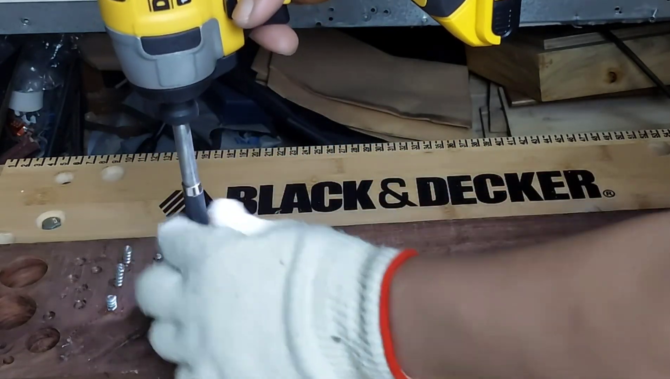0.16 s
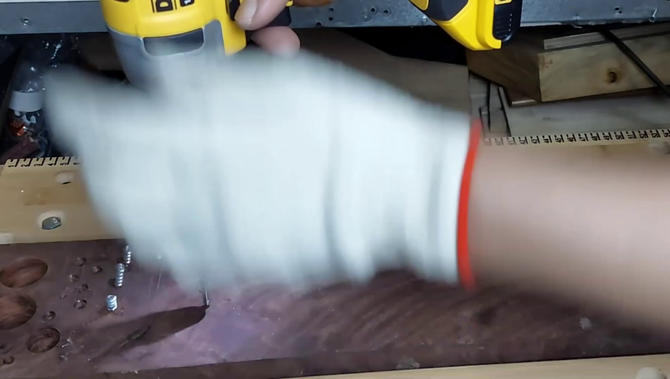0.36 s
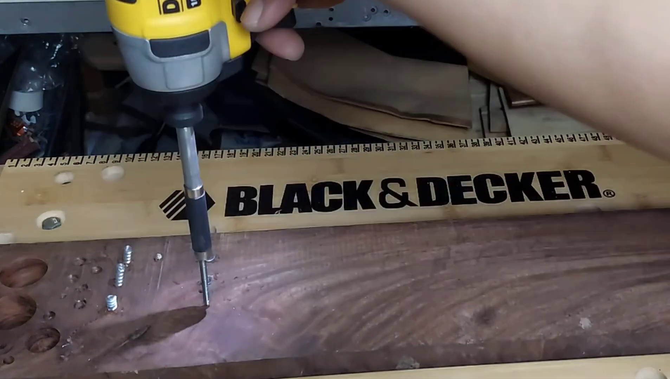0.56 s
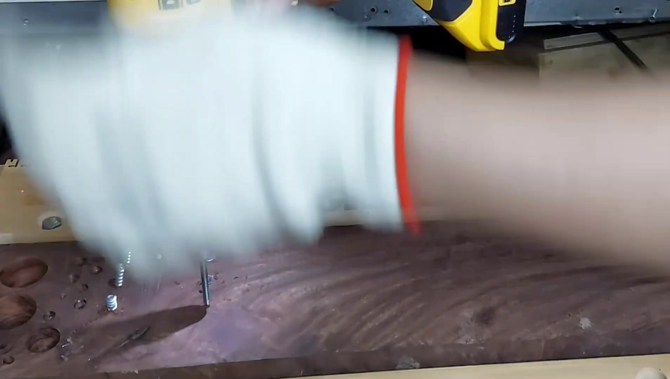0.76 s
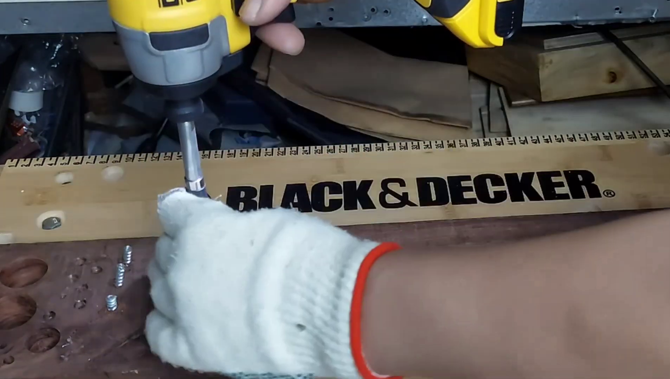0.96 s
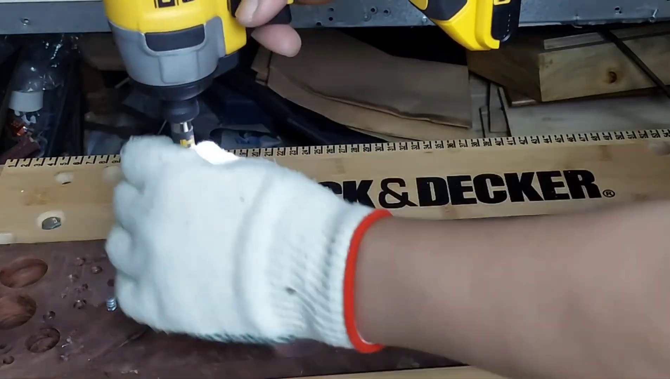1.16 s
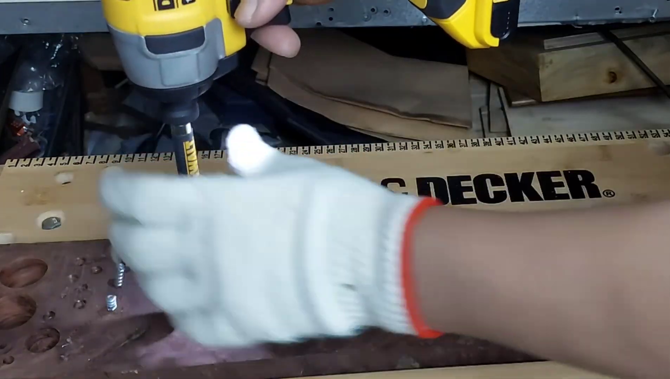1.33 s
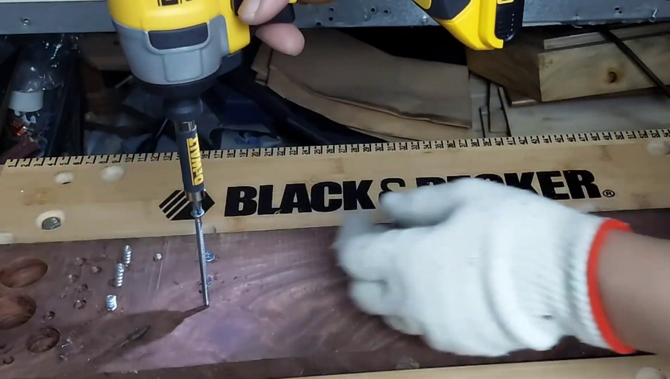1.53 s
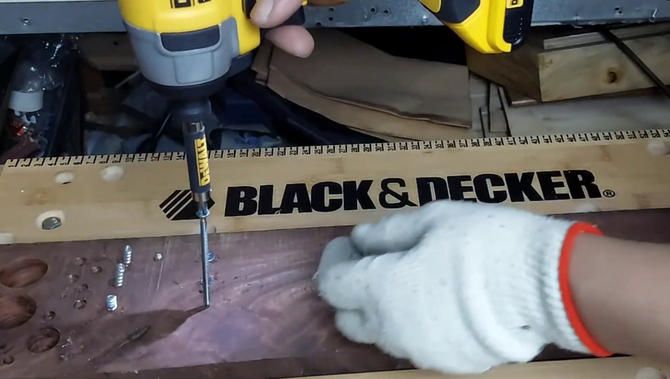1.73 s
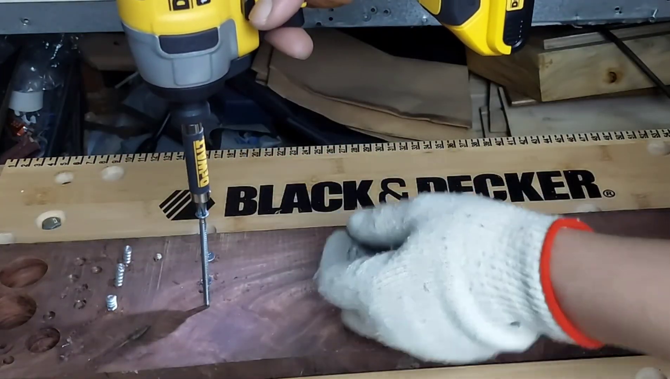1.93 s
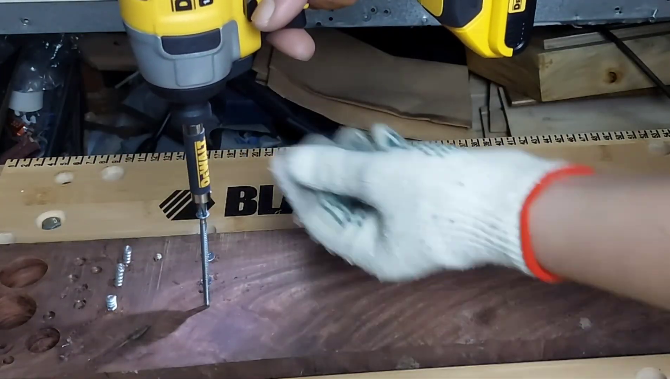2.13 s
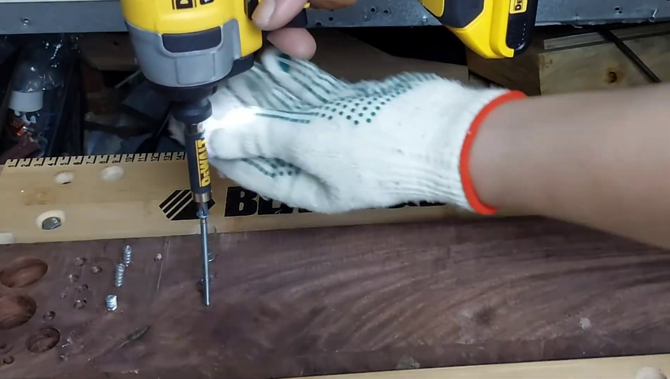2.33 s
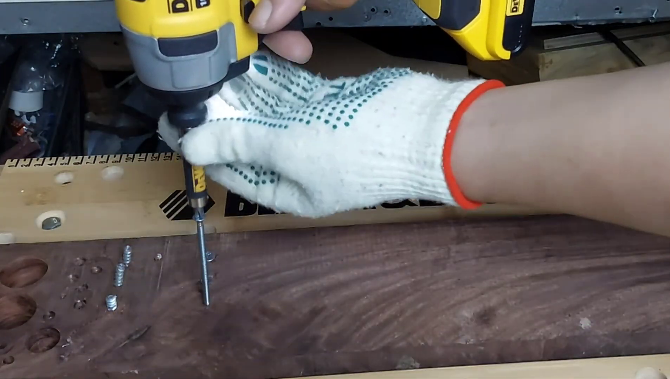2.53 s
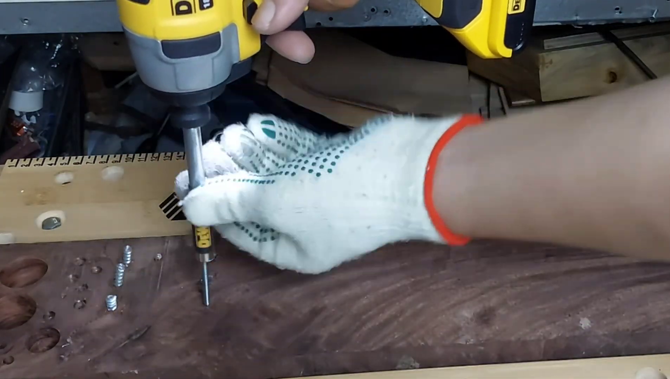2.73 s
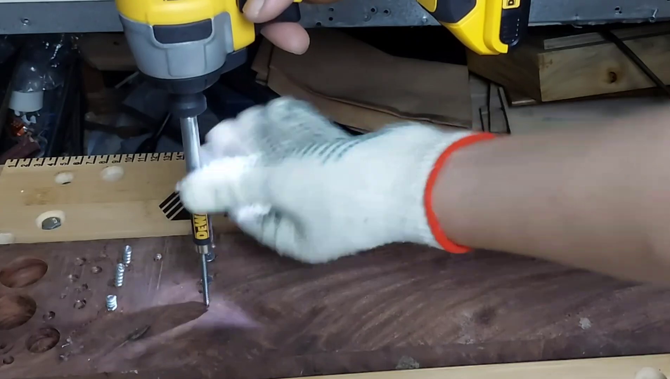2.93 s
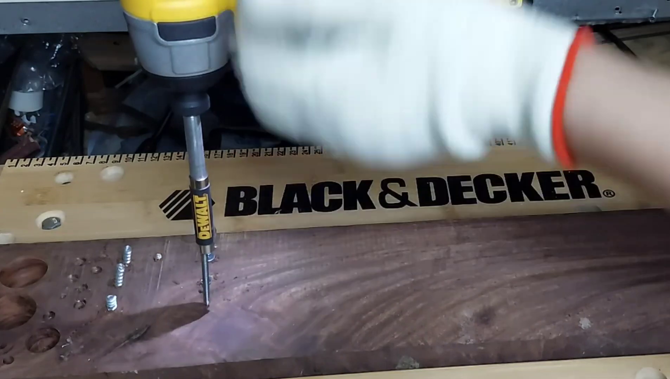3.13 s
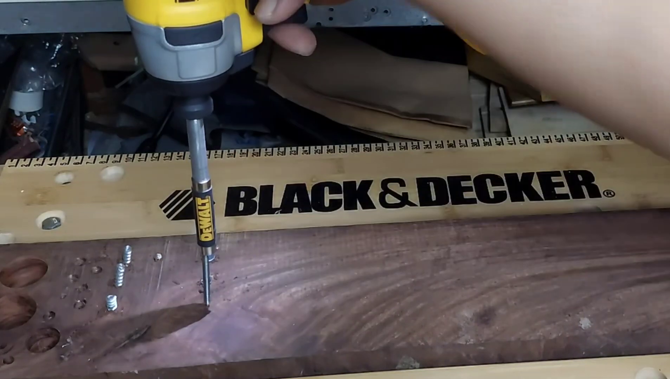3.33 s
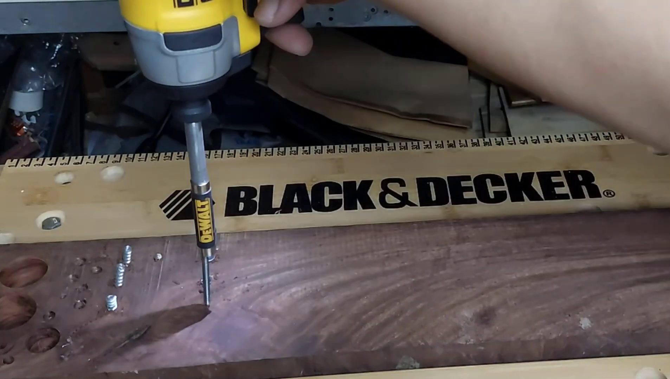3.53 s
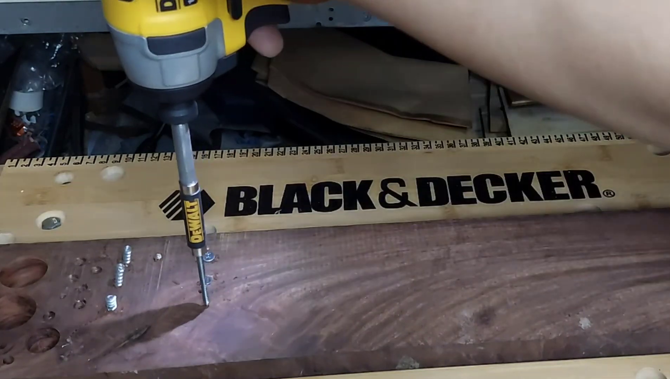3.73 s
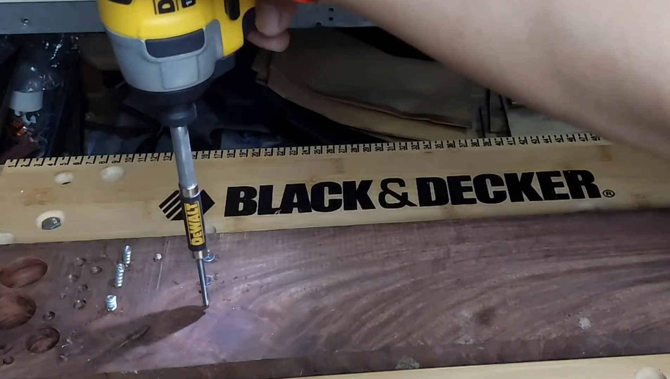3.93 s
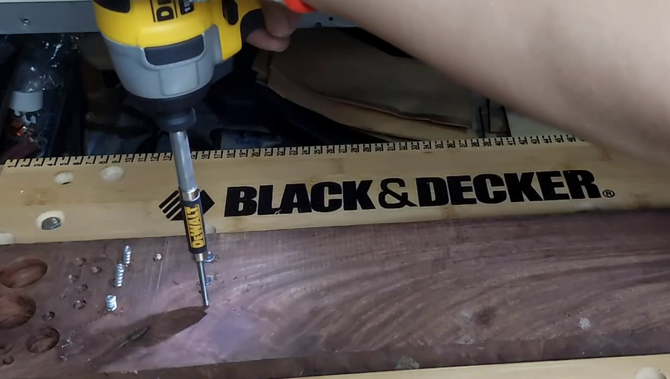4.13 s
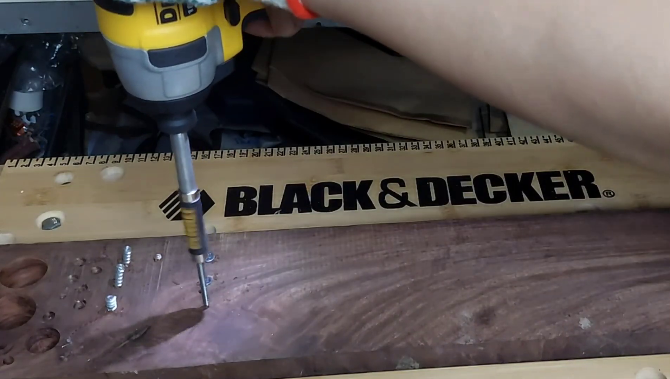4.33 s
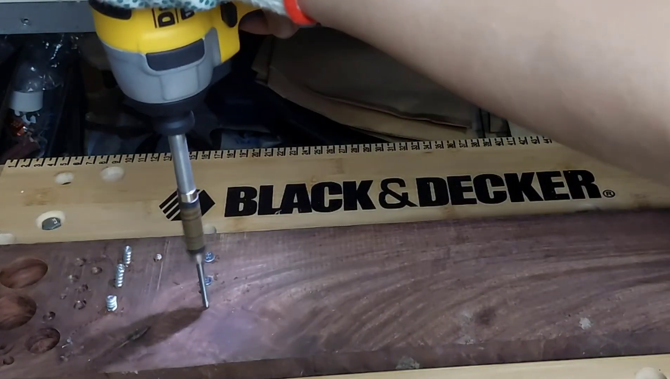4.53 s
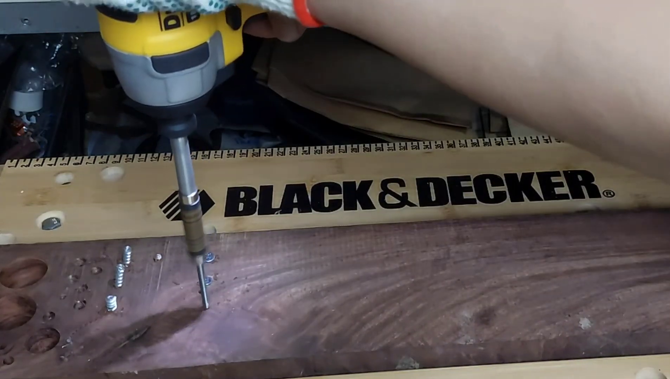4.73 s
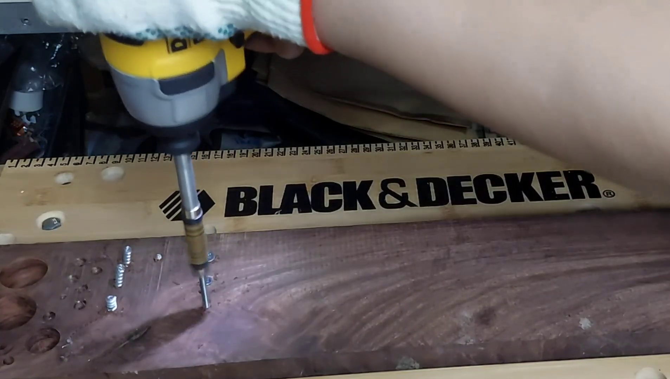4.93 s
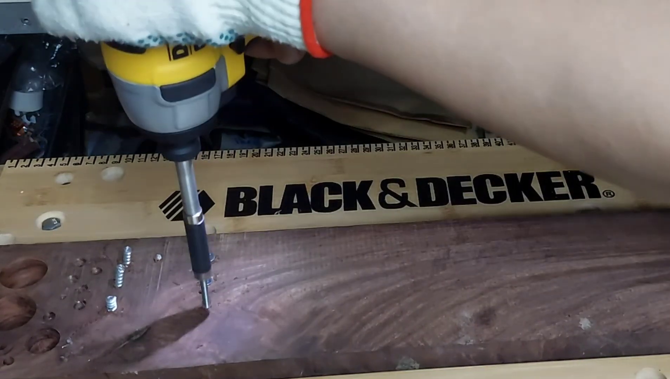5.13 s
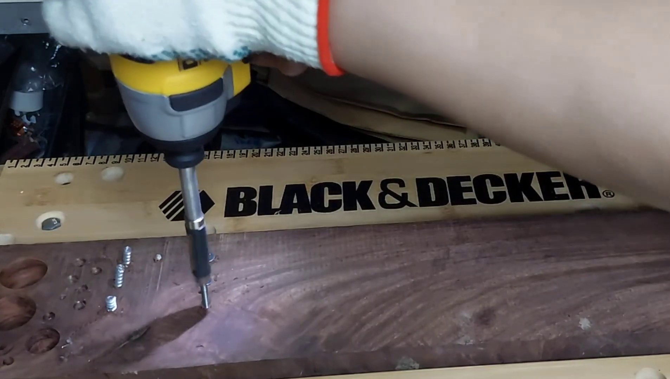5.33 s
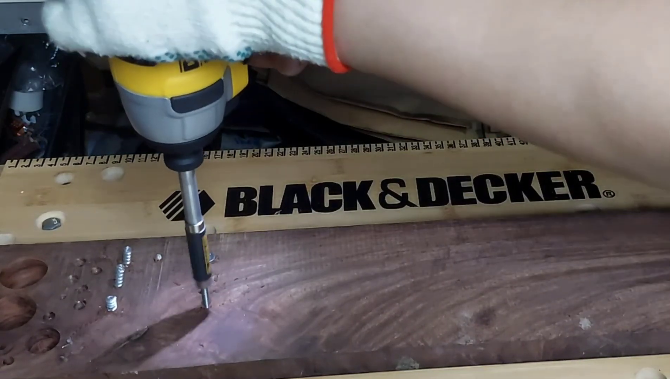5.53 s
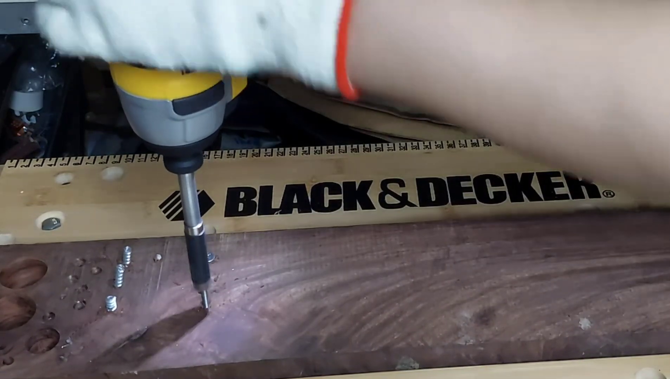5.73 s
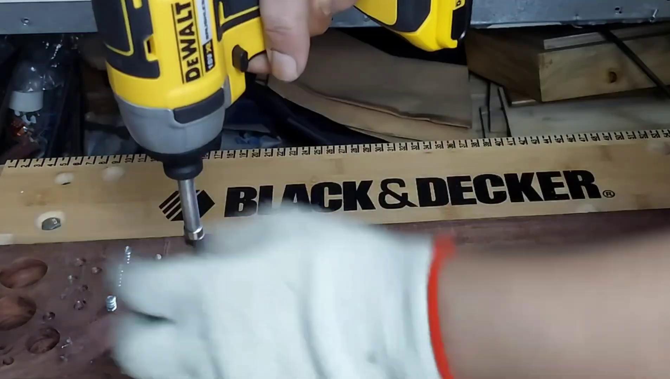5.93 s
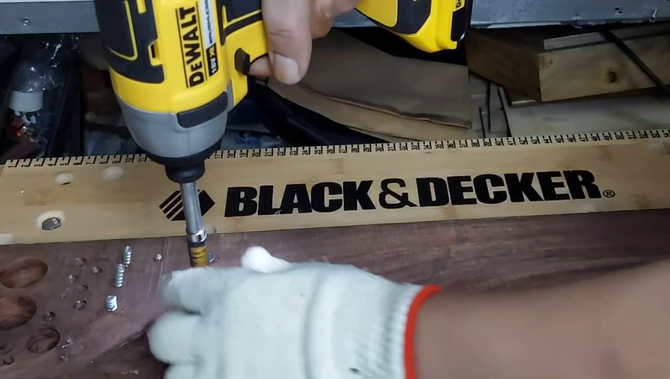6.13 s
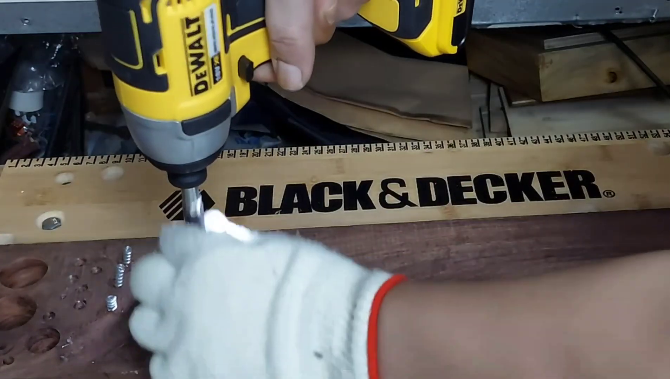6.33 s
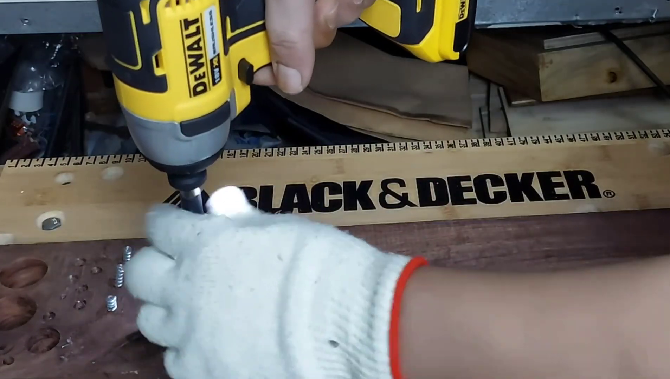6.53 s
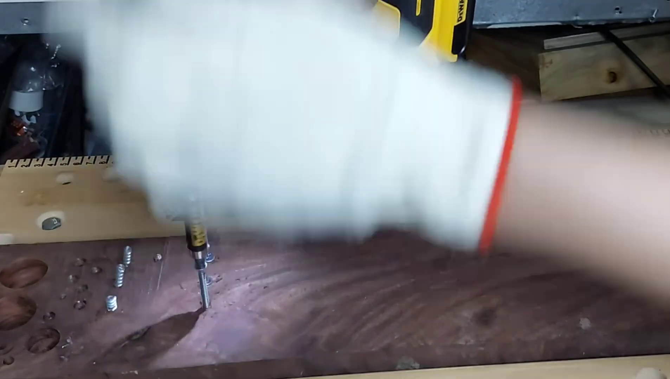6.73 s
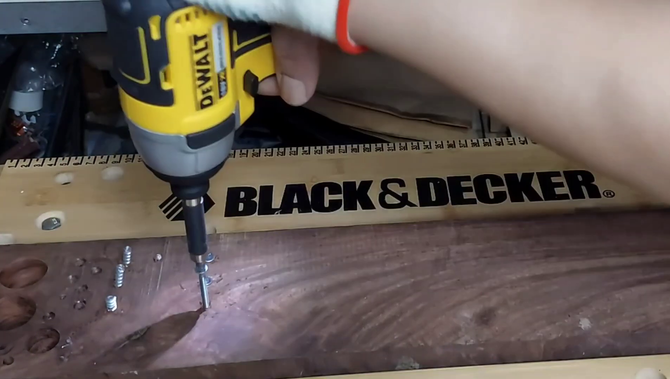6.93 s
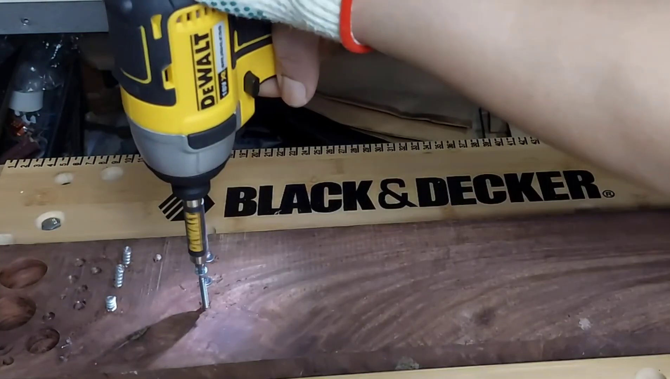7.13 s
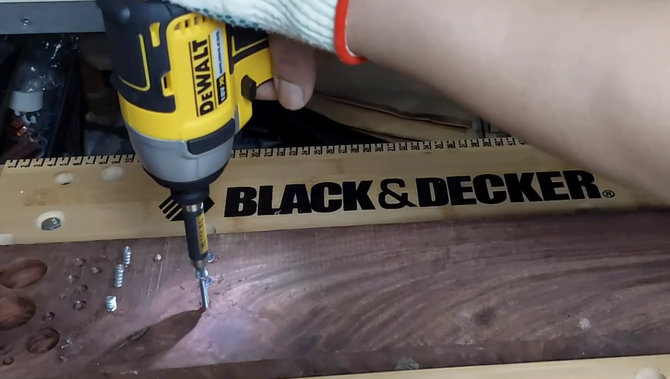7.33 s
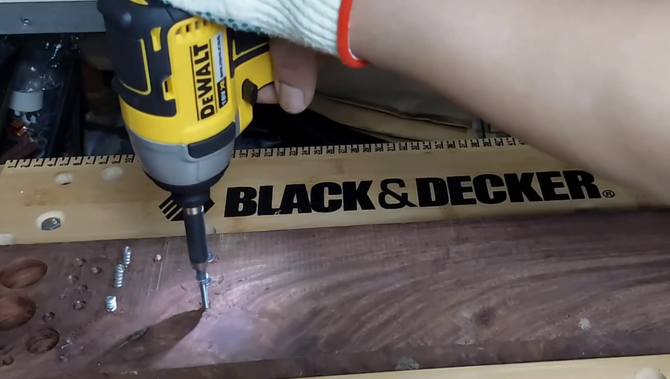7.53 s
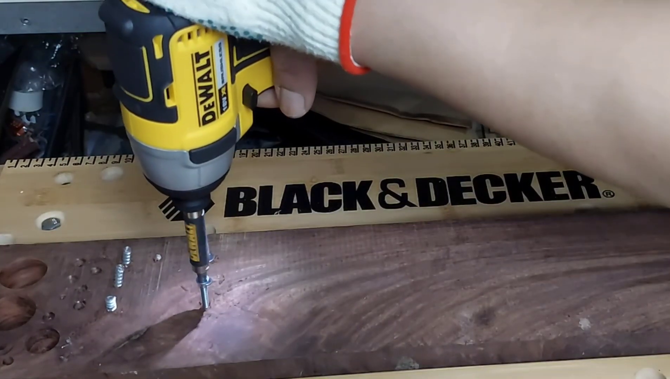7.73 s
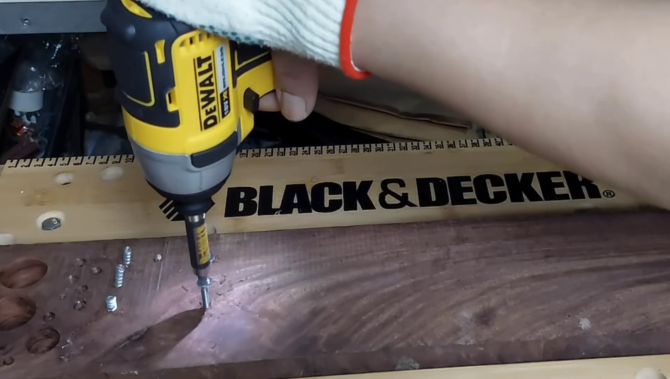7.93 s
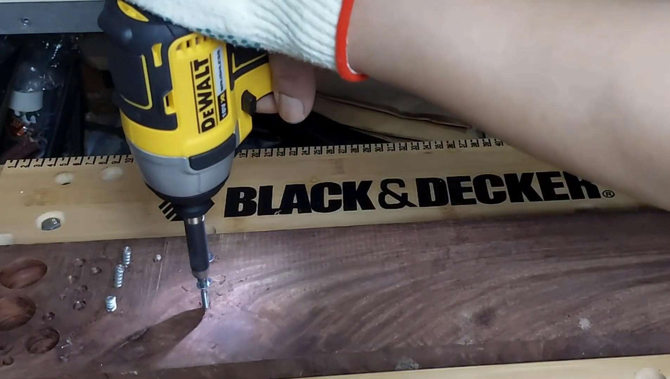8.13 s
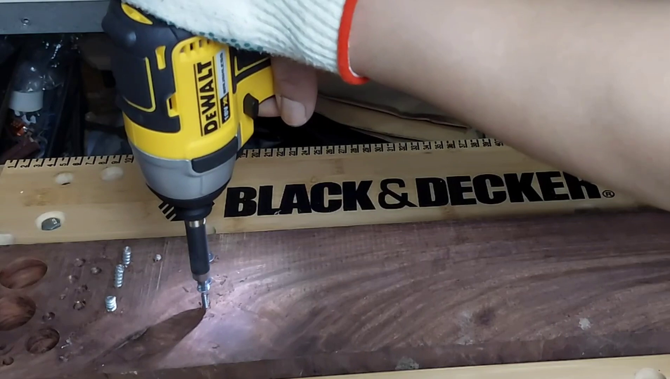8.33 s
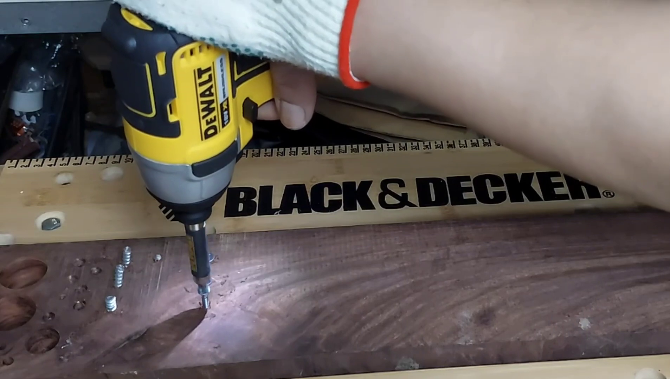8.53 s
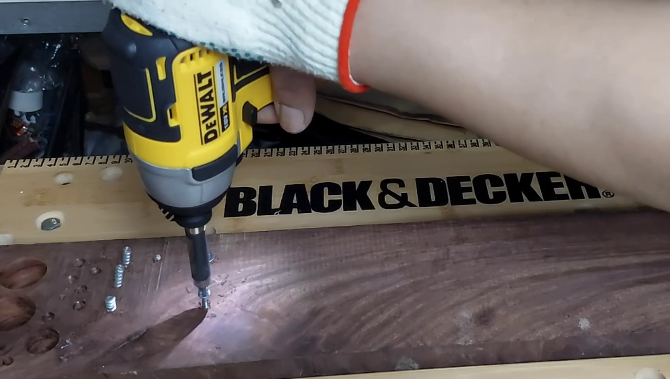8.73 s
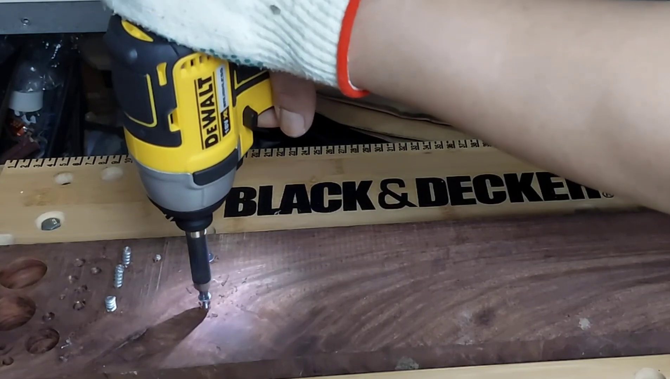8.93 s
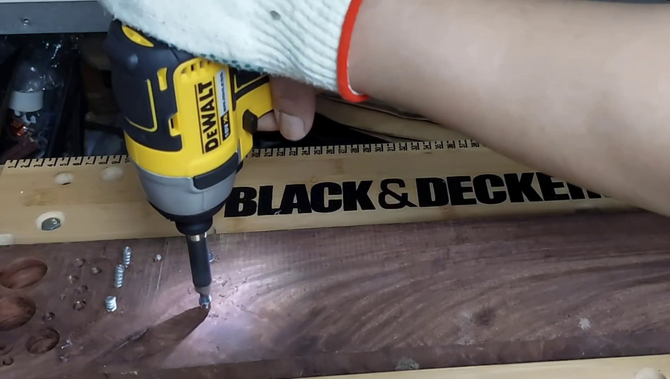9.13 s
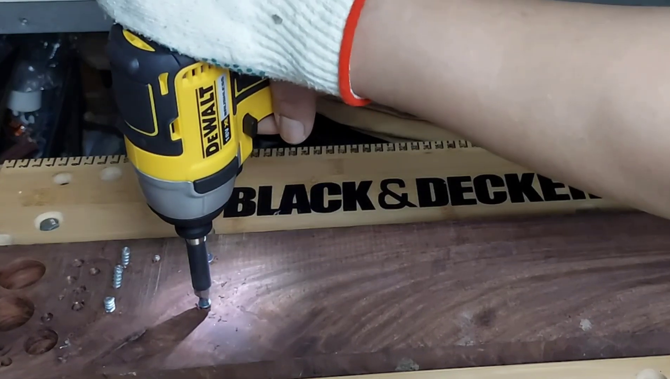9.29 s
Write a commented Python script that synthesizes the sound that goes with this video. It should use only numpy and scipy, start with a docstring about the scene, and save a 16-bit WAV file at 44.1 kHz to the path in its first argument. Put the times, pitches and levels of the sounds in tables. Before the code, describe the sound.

A low, quiet workshop rumble with a faint hum lies under everything, heard through one close microphone. For the first four and a half seconds a cloth glove brushes softly over a tool, with a few very faint squeaks. The steel sleeve on the bit gives light, ringing clicks at about 0.2, 1.3 and 2.9 seconds. At 4.5 seconds a sharper trigger click starts a cordless impact driver, which spins up with a gear whine. Around 5.1 seconds the pitch drops as a long screw bites into hardwood. At 5.2 seconds the hammering begins with a thump on the bench: a loud, very fast metallic rattle over the grinding motor, with tiny stumbles in its rhythm. It continues until the end, at about 9.4 seconds. The screw's ring climbs gradually as it sinks, and the wood and bit resonate more strongly in the last second.

```python
"""Steel clicks close to the microphone, over the low rumble of a small workshop: a gloved hand slides the
guide sleeve on the bit of a cordless impact driver. The motor spins up and bogs down as a long screw
bites into a hardwood plank on the bench. Then the hammer beats on the anvil, shaking bit, housing and
wood, and the screw rings higher as its free length shortens. One microphone, a short room tail."""
import sys
import numpy as np
from scipy import signal
from scipy.fft import rfft, irfft, next_fast_len
from scipy.io import wavfile
from scipy.ndimage import uniform_filter1d, minimum_filter1d

SR = 44100
rng = np.random.default_rng(int(sys.argv[2]) if len(sys.argv) > 2 else 0)


def file_out(sig):
    """Save sig as 16-bit WAV at sys.argv[1]."""
    # one column per channel
    cols = np.atleast_2d(sig).T
    # limit, then scale
    lim = np.clip(cols, -1, 1)
    pcm = np.round(lim * 32767).astype(np.int16)
    wavfile.write(sys.argv[1], SR, pcm)


N = 417186
TIME = np.arange(N) / SR

# room tone of the workshop (frequency [Hz], level [dB])
ROOM_COLOUR = [(20, -41), (42, -0.5), (65, -4), (117, -7.5), (205, -9.5), (300, -15), (450, -20),
               (1300, -22), (2750, -29), (8250, -44.5), (11500, -52.5)]
# mains hum (frequency [Hz], level [dB])
HUM_TONES = [(199.5, -54.5), (500.6, -60)]
# grip squeaks (time [s], length [s], first pitch [Hz], last pitch [Hz], level [dB])
GRIP_SQUEAKS = [(1.03, .07, 10700, 9300, -63), (4.04, .05, 11000, 8700, -60), (4.39, .1, 10200, 9700, -57),
                (4.475, 0.052, 9700, 11200, -53)]
# glove strokes along the tool (time [s], length [s], level [dB])
GLOVE_STROKES = [(0.109, 0.065, -44), (.79, .08, -53.5), (1.05, .2, -48), (1.4, .12, -52), (1.72, .2, -59),
                 (2.72, 0.25, -51), (3.04, 0.09, -55), (3.27, .06, -57), (4.05, 0.49, -54)]
# brushing cloth (frequency [Hz], level [dB])
CLOTH_COLOUR = [(500, -3), (1200, 11), (2500, 3), (5000, -3.5), (8000, -8.5), (10500, -9), (12000, -35)]
# sleeve and trigger clicks, one soft glove scrape, and the knock of the gears taking up slack as the motor
# starts # (time [s], level [dB], low-pass [Hz], contact [s], ping [Hz], ping level [dB])
HANDLING_CONTACTS = [(0.174, -20.5, 14000, 0.0051, 1680, -11), (1.034, -39, 2500, 0.012, 1220, -6),
                     (1.287, -23, 4500, 0.0039, 985, -7), (2.713, -47, 2500, 0.047, 2300, -25),
                     (2.896, -30, 5940, 0.0047, 985, 8), (2.9, -17.5, 6000, 0.0043, 2536, -4),
                     (4.52, -14, 5000, 0.002, 1205, -15)]
# modes of bit and sleeve (frequency [Hz], level [dB], t60 [s])
SLEEVE_MODES = [(985, -8, 0.23), (1680, -27, 0.14), (2536, -23, .3), (3670, -19, 0.16), (3940, -7, .2),
                (5700, -14, .2), (9679, -15, 0.28)]
# contact noise of a click or scrape (frequency [Hz], level [dB])
CONTACT_COLOUR = [(200, -26), (450, -2), (600, -1), (780, -11), (1100, 4.5), (1800, -6.5), (2500, -5),
                  (3200, -13), (4100, -5), (6500, -16), (9700, -14.5), (12000, -30)]
# gear tones (multiple of motor speed, free [dB], bogged down [dB], hammering [dB])
GEAR_TONES = [(4.48, -25, -29.5, -37), (7.1, -27, -15, -25), (14.1, -39, -15, -19), (20.4, -45, -19, -21.5),
              (27.2, -33, -20, -22), (35.3, -52, -24, -31.5), (42, -56, -24, -31)]
# rattling gears (frequency [Hz], level [dB])
GEAR_COLOUR = [(150, -29), (330, -12.5), (620, -19.5), (780, -9), (1020, 2.5), (1350, -2.5), (1620, -3.5),
               (2000, -5), (2500, -9), (3500, -6.5), (4800, -8.5), (6200, -13.5), (9000, -21), (11500, -33)]
# grinding teeth (frequency [Hz], level [dB])
GRIND_COLOUR = [(2500, 1.5), (5000, -1.5), (9800, -1), (12000, -35)]
# hammer tempo (time [s], rate [blows/s])
BLOW_RATE = [(5.2, 41), (6.0, 45), (6.9, 45), (7.35, 43.9), (7.8, 44.5), (9.1, 43.2)]
# slips of the cam (time [s])
CAM_SLIPS = [5.308, 5.67, 5.841, 6.026, 6.378, 6.653, 6.999, 7.17, 7.27, 7.535, 7.635, 8.161, 8.699, 8.796,
             8.963, 9.41]
# resonances of bench, plank, bit and housing (frequency [Hz], width [Hz], level [dB])
BENCH_MODES = [(144, 79, -7.5), (224, 20, -8.5), (303.5, 13.6, -1.5), (346, 23, -0.5), (451, 19.5, -5)]
PLANK_MODES = [(535, 45.5, 2), (595, 43, 3)]
BIT_MODES = [(855, 60, -4), (949, 34, 9), (1049, 40, 2.5)]
HOUSING_MODES = [(1036, 43, 5), (1215, 73, 5.5), (1335, 24, 4), (1424, 60, 6.5), (1573, 80, -1),
                 (1730, 38, -19)]
# how strongly bench, plank and bit ring (time [s], level [dB])
BENCH_RING = [(5.2, -36), (6.7, -41), (7.4, -39.5), (8.7, -33.5), (9.4, -37.5)]
PLANK_RING = [(5.3, -30), (5.96, -37.5), (6.48, -29.5), (8.66, -30), (9.26, -21), (9.4, -23.5)]
BIT_RING = [(5.25, -15), (5.61, -15.5), (6.42, -25.5), (8.31, -19), (8.76, -16), (8.82, -10), (9.4, -18)]
# ring of the screw's free length (time [s], frequency [Hz])
SCREW_PITCH = [(5.2, 1020), (5.8, 1070), (6.1, 1205), (6.8, 1220), (7.3, 1373), (8.3, 1430), (8.9, 1500)]
# clashing steel jaws (frequency [Hz], level [dB])
JAW_COLOUR = [(600, -6), (1100, -5.5), (1600, 5.5), (2100, -4.5), (2520, 4), (2850, -4.5), (3300, 4.5),
              (4100, -3), (4750, 2.5), (5500, -8.5), (6300, -3.5), (7300, -10.5), (9500, -11), (12000, -23)]
# bench under the first blow (frequency [Hz], level [dB])
BENCH_THUMP = [(80, -13.5), (150, -3), (330, -2), (600, 0), (1000, -13)]

BACKLASH_S, START_S, BITE_S, FIRST_BLOW_S = 4.521, 4.545, 5.061, 5.196
SPIN_UP_S, BITE_WIDTH_S, RECOVERY_S = .033, .026, .06
FREE_HZ, BOGGED_HZ, HAMMERING_HZ = 361, 221, 234  # motor turns per second
RATTLE_FREE_DB, RATTLE_BOGGED_DB, RATTLE_HAMMERING_DB = -15.5, -22.5, -19.5
SLOT_COUNT, FAN_BLADES = 9, 24
TOOTH_ONSET_MULTIPLE = 38  # gear tones up near this multiple need more load to sing


def from_db(db):
    """Decibels to gain."""
    return 10 ** (np.asarray(db) / 20)


def rms_one(x):
    """Scale to unit power."""
    return x / np.sqrt(np.mean(x ** 2) + 1e-20)


def since(s):
    """Seconds since a moment, zero before it."""
    return np.maximum(TIME - s, 0)


def curve(rows):
    """A (time, value) curve at every sample."""
    return np.interp(TIME, *np.transpose(rows))


def low_pass(x, hz, order=1):
    """Dull the treble."""
    return signal.sosfilt(signal.butter(order, hz, fs=SR, output="sos"), x)


def evened(x):
    """Unit power over about a fifth of a second while hammering; single blows still stand out."""
    def smooth(y):
        return np.abs(uniform_filter1d(uniform_filter1d(y, SR // 6), SR // 12))
    return x * np.sqrt(smooth(1. * (TIME > FIRST_BLOW_S)) / (smooth(x ** 2) + 1e-12))


def noise(colour):
    """Unit-power noise with the given spectrum, falling away past its ends."""
    hz, db = np.transpose(colour)
    size = next_fast_len(N)
    f = np.maximum(np.arange(size // 2 + 1) * SR / size, 1)
    gain = from_db(np.interp(np.log(f), np.log(hz), db))
    skirts = np.minimum(f / hz[0], 1) ** 2 * np.minimum(hz[-1] / f, 1) ** 10
    return rms_one(irfft(rfft(rng.standard_normal(size)) * gain * skirts, size)[:N])


def drift(per_s):
    """Random wander of unit spread."""
    knots = rng.standard_normal(N // 10)
    return rms_one(np.interp(TIME * per_s, np.arange(len(knots)), knots))


def fade(x, seconds):
    """Each click becomes a step that dies away exponentially."""
    return signal.lfilter([1], [1, -np.exp(-1 / (seconds * SR))], x + 1e-18)


def resonate(x, modes):
    """Parallel resonances, alternating in sign."""
    out = 0
    for k, (hz, width, db) in enumerate(modes):
        r = np.exp(-np.pi * width / SR)
        zeros = (1 - r * r) / 2 * np.array([1, 0, -1])
        poles = [1, -2 * r * np.cos(2 * np.pi * hz / SR), r * r]
        out += (-1) ** k * from_db(db) * signal.lfilter(zeros, poles, x + 1e-18)
    return out


def workshop(x, wet_db, t60, wall_hz):
    """Direct sound at the microphone, then a duller tail that begins with the nearest wall."""
    t = TIME[:SR // 2]
    tail = rng.standard_normal(len(t)) * from_db(-60 * t / t60) * (t > .006)
    tail = low_pass(tail / np.linalg.norm(tail), wall_hz)
    return x + from_db(wet_db) * signal.fftconvolve(x, tail)[:N]


def room_tone():
    """Low rumble and hiss all round the bench, with a faint mains hum."""
    hum = sum(from_db(db) * np.sin(2 * np.pi * hz * TIME + 1.5 * drift(5)) for hz, db in HUM_TONES)
    return from_db(-42 + .5 * drift(7.4)) * noise(ROOM_COLOUR) + np.sqrt(2) * hum


def grip_squeaks():
    """Thin gliding tones as the hand shifts on the grip."""
    out = np.zeros(N)
    for s, length, first_hz, last_hz, db in GRIP_SQUEAKS:
        hz = np.linspace(first_hz, last_hz, int(length * SR))
        tone = np.sin(2 * np.pi * np.cumsum(hz) / SR)
        out[int(s * SR):][:len(hz)] += from_db(db) * np.hanning(len(hz)) * tone
    return out


def glove(attack_s=.014, release_s=.07):
    """Knitted cloth brushes the tool, close and dry: each stroke swells, holds and dies away."""
    level = sum(from_db(db) * (1 - np.exp(-since(s) / attack_s)) * np.exp(-since(s + length) / release_s)
                for s, length, db in GLOVE_STROKES)
    return level * from_db(drift(70)) * noise(CLOTH_COLOUR)


def handling(ring_db=-18, rise_s=.0014, ping_t60=.09):
    """Sleeve and trigger clicks, one soft glove scrape and the gears' backlash knock: each a noise burst with a
    ring and a ping."""
    rasp, out = noise(CONTACT_COLOUR), np.zeros(N)
    hz, db, t60 = np.transpose(SLEEVE_MODES)[:, :, None]
    t = TIME[:SR // 2]
    for s, level_db, dull_hz, contact_s, ping_hz, ping_db in HANDLING_CONTACTS:
        span = slice(round(s * SR), round(s * SR) + len(t))
        mode_db = db + ring_db + rng.normal(0, 1, db.shape)
        ring = np.sum(from_db(mode_db - 60 * t / t60) * np.sin(2 * np.pi * hz * t), axis=0)
        # where the contact lands decides which mode sings out
        ping = from_db(ping_db + .5 - 60 * t / ping_t60) * np.cos(2 * np.pi * ping_hz * t)
        hit = (2 * rasp[span] * np.exp(-t / contact_s) + ring + ping) * (1 - np.exp(-t / rise_s))
        out[span] += from_db(level_db) * low_pass(hit, dull_hz)
    return out


def gear_whine(turns, load, relief, rough_db=3.5, case_hz=6060):
    """Meshing teeth sing, most of them louder under load; the case muffles the highest tones."""
    whine = 0
    for multiple, free_db, bogged_db, hammering_db in GEAR_TONES:
        needed = (multiple / TOOTH_ONSET_MULTIPLE) ** 2
        pressed = load * (1 + needed) / (load + needed)
        db = free_db + pressed * (bogged_db - free_db) + relief * (hammering_db - bogged_db)
        level = from_db(db + rough_db * drift(260))
        phase_jitter = (.35 + .02 * multiple) * drift(500)
        whine += level * np.sin(2 * np.pi * multiple * turns + phase_jitter)
    return low_pass(whine, case_hz, order=2)


def stator_whine(turns, load, relief, inrush_s=.115):
    """The slots whine with the current drawn to speed up and pull the load, less once the hammer trips."""
    current = np.maximum(np.exp(-(since(START_S) / inrush_s) ** 4), .88 * load ** .26)
    db = -32 + 14 * current - 20 * relief + 2 * drift(200)
    return from_db(db) * np.sin(2 * np.pi * SLOT_COUNT * turns)


def fan(turns, load):
    """The blade tone fades as the load comes on."""
    return from_db(-37 + 2.9 * drift(22)) * (1 - load) ** 4 * np.sin(2 * np.pi * FAN_BLADES * turns)


def gear_rattle(turns, jolt_db, spun, load, relief, rise_s=.024, grind_db=-4.5):
    """Free gears rattle most, loaded teeth grind brighter; both swell with each turn and hammer cycle."""
    db = RATTLE_FREE_DB + 7 * (1 - spun)  # starting torque throws the gears about
    db += load * (RATTLE_BOGGED_DB - RATTLE_FREE_DB) + relief * (RATTLE_HAMMERING_DB - RATTLE_BOGGED_DB)
    level = from_db(db) * (1 - np.exp(-(since(START_S) / rise_s) ** 2))
    # the rotor's first twitch takes up the slack
    backlash = from_db(-21.5) * (TIME > BACKLASH_S) * np.exp(-since(BACKLASH_S) / .025)
    teeth = from_db(drift(330) + drift(50) + np.sin(2 * np.pi * turns) + jolt_db)
    rattle = (level + backlash) * rms_one(teeth * noise(GEAR_COLOUR))
    grind = from_db(grind_db) * level * load * rms_one(teeth * noise(GRIND_COLOUR))
    return rattle + grind


def motor(times):
    """The motor spins up and bogs down, then slows to wind the hammer spring and races as it lets go."""
    # shares from 0 to 1: spun up, loaded by the thread, relieved by the tripping hammer
    spun = 1 - np.exp(-since(START_S) / SPIN_UP_S)
    load = .5 + .5 * np.tanh((TIME - BITE_S) / (2 * BITE_WIDTH_S))
    relief = 1 - np.exp(-since(FIRST_BLOW_S) / RECOVERY_S)
    speed = spun * (FREE_HZ + load * (BOGGED_HZ - FREE_HZ) + relief * (HAMMERING_HZ - BOGGED_HZ))
    beating = TIME > times[0]
    cycle = np.interp(TIME, times, np.arange(len(times)))
    swing = .037 * np.cos(2 * np.pi * (cycle - .386)) + .02 * drift(110)
    flutter = (.001 + .006 * load) * drift(260)
    turns = np.cumsum(speed * (1 + swing * beating + flutter)) / SR
    tones = gear_whine(turns, load, relief) + stator_whine(turns, load, relief) + fan(turns, load)
    jolt_db = 2 * beating * np.cos(2 * np.pi * (cycle - .13))
    rattle = gear_rattle(turns, jolt_db, spun, load, relief)
    return workshop(spun * tones, wet_db=-5, t60=.29, wall_hz=8000) + rattle


def blow_times(jitter_s=.00006):
    """Blows follow the tempo evenly until the cam slips and a new run begins."""
    beats = np.cumsum(curve(BLOW_RATE)) / SR
    marks = np.interp([FIRST_BLOW_S, *CAM_SLIPS, TIME[-1]], TIME, beats)
    runs = [np.arange(first, last - .5) for first, last in zip(marks, marks[1:])]
    times = np.interp(np.concatenate(runs), beats, TIME)
    return times + jitter_s * rng.standard_normal(len(times))


def strikes(times, force_db, scatter_db):
    """An impulse for every blow; each part takes up a slightly different share."""
    out = np.zeros(N)
    samples = np.clip((times * SR).astype(int), 0, N - 1)
    out[samples] = from_db(force_db + scatter_db * rng.standard_normal(len(times)))
    return out


def bench_and_plank(times, force_db):
    """The blows push on the wood and ring its low modes."""
    high_pass = signal.butter(2, 200, "high", fs=SR, output="sos")
    push = signal.sosfilt(high_pass, strikes(times, force_db, scatter_db=.9))
    bench = from_db(curve(BENCH_RING)) * evened(resonate(push, BENCH_MODES))
    plank = from_db(curve(PLANK_RING) - 1) * evened(resonate(push, PLANK_MODES))
    return bench + plank


def bit_ring(times, force_db):
    """The bit rings under each blow."""
    ring = resonate(strikes(times, force_db, scatter_db=3.5), BIT_MODES)
    return from_db(curve(BIT_RING) - .5) * evened(ring)


def screw_and_housing(times, force_db, width_hz=172):
    """The screw's broad bending mode climbs as it sinks, lighting up the housing's modes in turn."""
    knock_back = strikes(times + .0091, force_db - 11, scatter_db=4.5)  # the bit rocks in the screw head
    knocks = strikes(times, force_db, scatter_db=2) + knock_back
    phasor = np.exp(2j * np.pi * np.cumsum(curve(SCREW_PITCH)) / SR)
    screw = np.real(phasor * fade(knocks / phasor, 1 / (np.pi * width_hz)))
    return from_db(-15.5) * evened(resonate(screw, HOUSING_MODES))


def jaw_clash(times, force_db, rebound_s=.004, rise_s=.00046, decay_s=.0032):
    """Steel jaws clash and rebound, ringing alike on every blow; loose parts chatter anew each time."""
    contact = strikes(times, force_db, scatter_db=5)
    contact += strikes(times + rebound_s, force_db - 4.5, scatter_db=7.5)
    t = TIME[:SR // 8]
    ring = noise(JAW_COLOUR)[:len(t)] * np.exp(-t / decay_s) * (1 - np.exp(-t / rise_s))
    jaws = signal.fftconvolve(contact, ring)[:N]
    chatter = fade(contact, .0086) * noise(JAW_COLOUR)
    return from_db(-16.5) * evened(rms_one(jaws) + from_db(1.5) * rms_one(chatter))


def hammer(times, uneven_db=1.5, opening_db=5.5):
    """The hammer beats on the anvil, shaking tool, screw and wood; its first blow thumps the bench."""
    force_db = uneven_db * rng.standard_normal(len(times))
    wood = bench_and_plank(times, force_db)
    bit = bit_ring(times, force_db)
    housing = screw_and_housing(times, force_db)
    clash = jaw_clash(times, force_db)
    first_blow = 1. * (np.arange(N) == round(times[0] * SR))
    thump = from_db(-13) * fade(first_blow, .022) * noise(BENCH_THUMP)
    opening = from_db(opening_db * np.exp(-since(FIRST_BLOW_S) / .025))  # the first blows land hardest
    return bit + housing + thump + opening * (wood + workshop(clash, wet_db=-6, t60=.3, wall_hz=9300))


def scene():
    """At the bench, in mono: handling first, then the driver at work."""
    times = blow_times()
    contacts = workshop(handling(), wet_db=-6, t60=.47, wall_hz=9000)
    driver = hammer(times) + motor(times)
    return (contacts + glove() + grip_squeaks() + driver + room_tone())[None]


def record(dry):
    """Behind the microphone, a fast limiter holds the peaks under full scale and the top is cut."""
    needed_gain = np.minimum(1, .94 / (np.abs(dry) + 1e-9))
    gain = uniform_filter1d(minimum_filter1d(needed_gain, size=221), size=111)
    top_cut = signal.firwin(401, 12000, fs=SR, window="blackmanharris")
    return signal.fftconvolve(dry * gain, top_cut[None], mode="same")


dry = scene()
out = record(dry)
file_out(out)
```